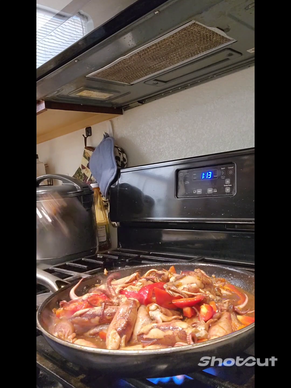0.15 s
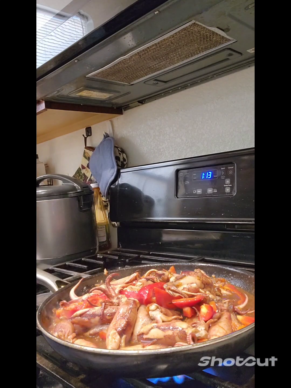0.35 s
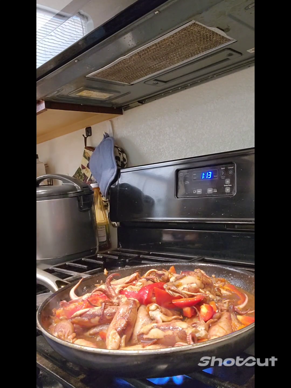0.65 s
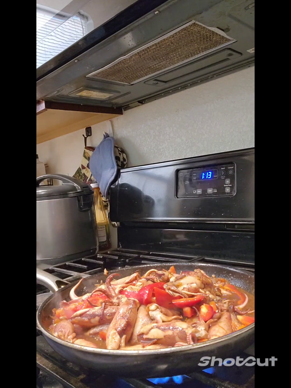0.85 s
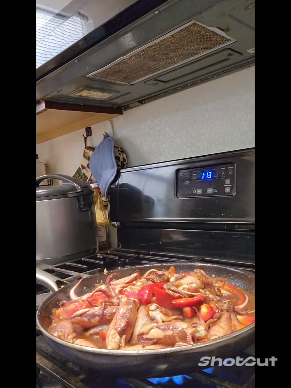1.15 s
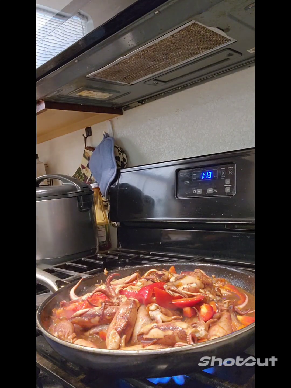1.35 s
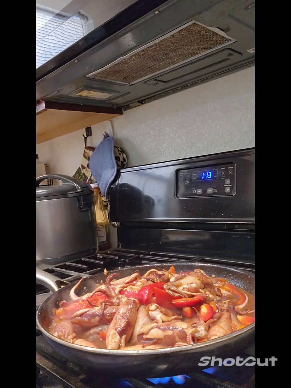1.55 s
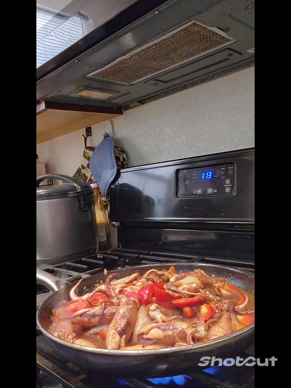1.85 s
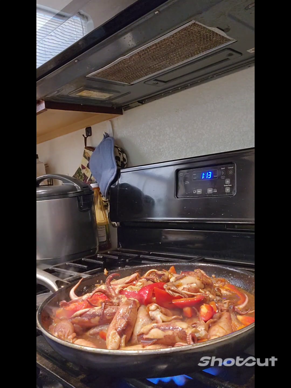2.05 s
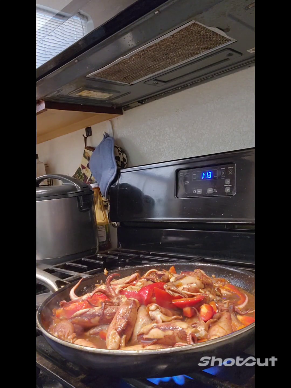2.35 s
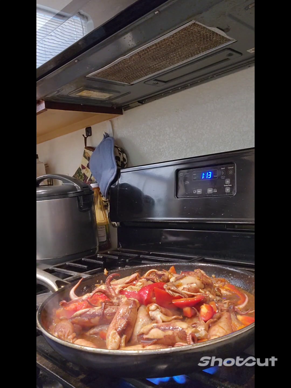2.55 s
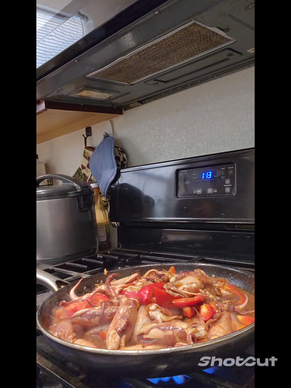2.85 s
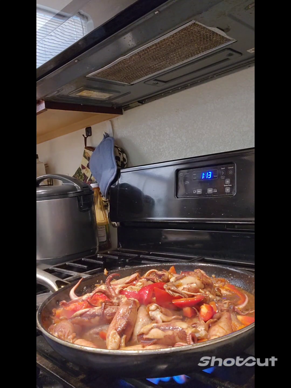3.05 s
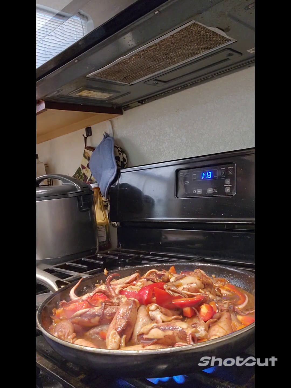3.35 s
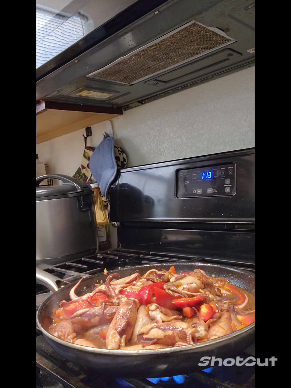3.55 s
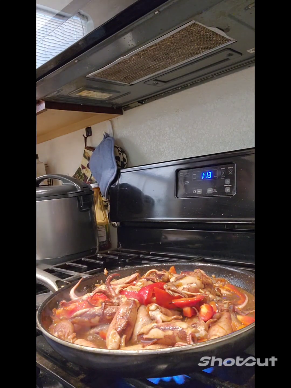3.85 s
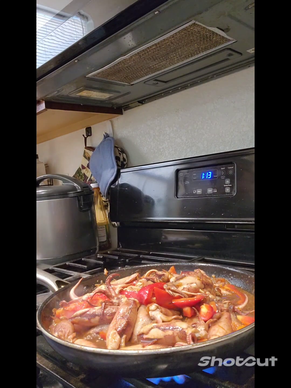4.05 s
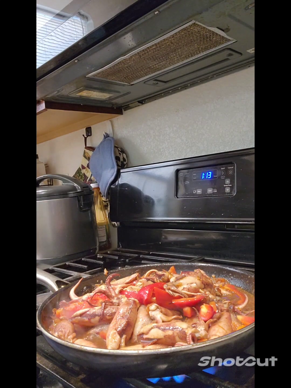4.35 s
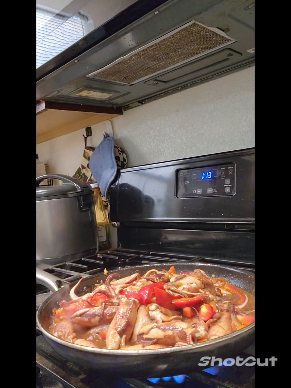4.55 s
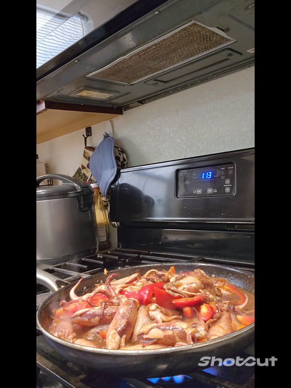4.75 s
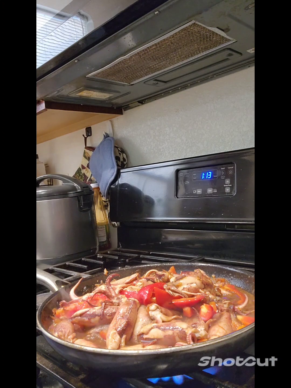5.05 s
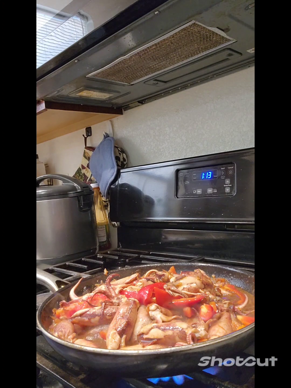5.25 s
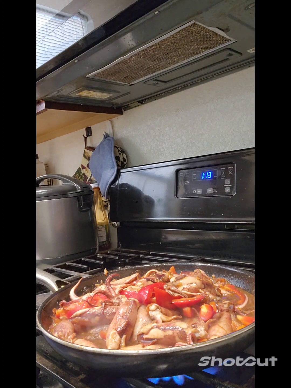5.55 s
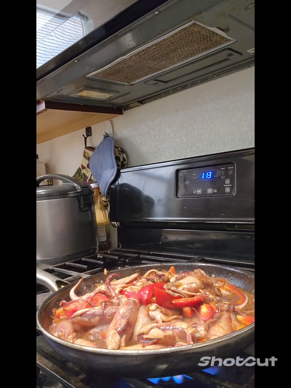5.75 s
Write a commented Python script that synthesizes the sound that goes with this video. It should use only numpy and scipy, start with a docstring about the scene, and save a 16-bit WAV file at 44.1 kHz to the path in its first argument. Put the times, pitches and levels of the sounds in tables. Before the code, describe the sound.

A gas flame rumbles quietly throughout, with the faint fizz of food simmering in a pan close to the microphone in a small kitchen. At about 0.1 seconds, metal tongs tap the pan once, slightly left, making it ring briefly and the stove top hum. From 0.8 to 1.7 seconds the tongs land on the counter and rattle to rest in about a dozen uneven, fading clacks, with a bubble popping among them. Faint rustles follow around 1.9 and 2.5 seconds. At 3.4 seconds comes the loudest sound, something like a cupboard door banging shut on the right, with a low boom, a short jangle of hardware and an immediate softer rebound. Soft rubbing movements are heard from 4 to 4.7 seconds. Four small bubbles pop in the sauce between 5 and 5.3 seconds, and one last faint rustle passes at 5.6 over the steady flame.

```python
"""A small kitchen, the microphone close to a pan of meat and vegetables simmering on a gas stove.
Tongs tap the pan and ring it, then are laid on the counter and rattle to rest. Something like a
cupboard door bangs shut and rebounds, its panel booming and its hardware jangling. A few thick
bubbles pop in the sauce and soft movements rustle nearby, over the low rumble of the flame
and the fizz of countless tiny bursts."""
import sys
import numpy as np
from scipy import signal
from scipy.fft import rfft, irfft
from scipy.io import wavfile
from scipy.ndimage import uniform_filter1d

SR = 44100
rng = np.random.default_rng(int(sys.argv[2]) if len(sys.argv) > 2 else 0)


def digitize_waveform(pressure):
    """Quantize a signal to 16-bit integers and store it at the path in sys.argv[1].

    Rows of a 2-D input are taken as channels; values are limited to [-1, 1].
    """
    field = np.atleast_2d(pressure).T
    bounded = np.clip(field, -1, 1)
    quanta = np.round(bounded * 32767).astype(np.int16)
    wavfile.write(sys.argv[1], SR, quanta)


N = 259483
AGE = np.arange(SR) / SR  # time since a blow [s]

# modes of the pan: (frequency [Hz], level [dB], t60 [s])
PAN_MODES = [(665, -16, 0.27), (815, -17, 0.24), (990, -23, 0.13), (1106, 12, 0.23), (1325, 11, 0.042),
             (1596, -3, .12), (1940, -3, 0.083), (1950, 0, 0.12), (3380, 0, .2), (4870, -23, 0.18)]


def tongs_on_pan(out):
    """A hard tap ticks and rings the pan, which shakes the stove top and chatters on its grate."""
    # taps: (time [s], level [dB], stove level [dB])
    taps = [(0.089, -18, -31)]
    # spectrum of the contact: (frequency [Hz], gain [dB])
    pan_colour = [(59, -20), (100, 2.5), (324, 4), (452, -2.5), (718, -4.5), (942, -13), (1090, 1),
                  (1430, -41), (2090, -5), (2520, -38), (3320, -16), (5040, -17.5), (6090, -25.5),
                  (15000, -52)]
    # modes of the stove top: (frequency [Hz], level [dB], t60 [s])
    stove_modes = [(71.1, -0.5, 0.85), (124, 1, 0.43), (190.4, -9.5, 0.66), (250, -4, 0.25),
                   (360, -7, 0.46)]
    for s, db, stove_db in taps:
        contact = unit(colour(crack(t60=0.017, room_db=-1.5, near_db=3, left_db=11), pan_colour))
        tick = undb(-3) * unit(ports(np.sin(2 * np.pi * 1650 * AGE) * fade(0.0093)))
        pan = undb(-7) * ring(PAN_MODES, spread=0.27)
        add(out, s, peak_level(tick + contact + pan, db))
        chatter = band(diffuse(len(AGE)), 660, 1430) * fade(0.14)
        add(out, s + 0.008, peak_level(chatter, -26))
        stove = ring(stove_modes, spread=0.15) * rise(0.0088)
        add(out, s, peak_level(stove, stove_db))


def tongs_on_counter(out, full_blow_db=-24):
    """The tongs land and rock: heavy blows last longer with more bass, hard ones ring the arms more."""
    # blows: (time [s], level [dB], treble [dB], counter ring [dB])
    blows = [(0.819, -21, 5.5, -9.5), (0.8764, -35.5, -17, -24), (1.004, -18.5, -1.5, 0),
             (1.133, -42.5, -10, -5), (1.210, -31.5, -3, 0), (1.267, -37.5, -3, -12),
             (1.3115, -25, 5.5, -9), (1.397, -34, 4.5, 2.5), (1.407, -35, -8, -2), (1.458, -38, 1.5, -1),
             (1.503, -40, 0, -2), (1.7283, -42.5, -6, -7)]
    # spectrum of the contact: (frequency [Hz], gain [dB])
    contact_colour = [(59, -32), (100, -5.5), (434, -11), (885, -4.5), (1000, -8), (1590, -6), (1880, -12),
                      (2090, -9), (2800, -17.5), (3760, -13), (4730, -24.5), (5260, -21.5), (7510, -29.5),
                      (9070, -36), (15000, -50)]
    # modes of the steel arms: (frequency [Hz], level [dB], t60 [s])
    arm_modes = [(650, -7.5, 0.064), (774, -14, 0.077), (1266, 15, 0.04), (1488, -5, 0.13),
                 (2326, -0.5, 0.15), (2380, -7, .18), (3560, -3, 0.13), (4200, -18, 0.42),
                 (5030, 5.5, 0.034), (7400, -5, .05)]
    # modes of the counter: (frequency [Hz], level [dB], t60 [s])
    counter_modes = [(531, -14.5, 0.39), (750, -19, 0.12), (878, 3.5, 0.13), (1095, -6, 0.082),
                     (1177, 5, 0.073), (1347, 9.5, 0.048), (1604, 0, 0.15), (1744, -23, 0.089),
                     (2000, -6, 0.14), (3190, -14.5, 0.15), (3360, -11, 0.083), (4223, -9.5, 0.09)]
    for s, db, treble_db, counter_db in blows:
        force_db = db - full_blow_db
        t60 = 0.051 * undb(0.2 * force_db)
        contact = unit(colour(crack(t60, room_db=-5.5, near_db=-6, left_db=3), contact_colour))
        arms = undb(-7.5 + 0.25 * treble_db) * ring(arm_modes, spread=0.25)
        counter = undb(counter_db) * ring(counter_modes, spread=0.24)
        blow = (contact + arms + counter) * rise(0.0012)
        hardness = [(350, -1 + 0.11 * force_db), (800, -0.89), (1900, 0.62), (4200, treble_db)]
        add(out, s, peak_level(colour(blow, hardness), db))


def tongs_squeak(out):
    """Steel slides on the counter with a faint, wavering tone."""
    # slides: (time [s], length [s], pitch [Hz], level [dB])
    slides = [(1.233, 0.091, 3345, -50)]
    for s, length, hz, db in slides:
        count = int(length * SR)
        waver = uniform_filter1d(rng.standard_normal(count), size=100)
        tone = np.sin(2 * np.pi * np.cumsum(hz * (1 + 0.11 * waver)) / SR)
        add(out, s, peak_level(ports(tone * signal.windows.tukey(count, 0.5)), db))


def cupboard_door(out, crack_db=-14.5, latch_t60=0.35):
    """Off to the right a door panel booms, its hardware jangles, and the room answers."""
    # the bang and its rebound: (time [s], force [dB])
    knocks = [(3.3906, 0.5), (3.506, -16.5)]
    # spectrum of the contact: (frequency [Hz], gain [dB])
    door_colour = [(88, -33), (150, -1), (238, -12.5), (371, -7.5), (612, -13), (757, -14.5), (1200, -21.5),
                   (1350, -19.5), (1670, -21.5), (2360, -19.5), (2600, -25.5), (3210, -20.5), (3970, -22),
                   (5510, -18), (15000, -45.5)]
    # modes of the panel: (frequency [Hz], level [dB], t60 [s])
    panel_modes = [(55, -27, 0.22), (76.1, 2, 0.33), (93.7, -8, 0.12), (121.5, -4.5, 0.21), (140, -16, 0.4),
                   (190, 1, 0.046), (246, -4.5, 0.063), (282.7, -12.5, 0.13), (304, -28, 0.096),
                   (338.4, -13.5, 0.19), (381, -19.5, 0.32), (463, -16, 0.23), (528, -19, 0.23)]
    # modes of the hardware: (frequency [Hz], level [dB], undamped t60 [s])
    hardware_modes = [(740, 6, 0.35), (990, -1, 0.13), (1341, 7, 0.16), (1844, 8, 0.11), (2130, -21, 0.19),
                      (3030, -14, 0.17), (3000, -14, 0.12), (4580, -30, 0.22), (4050, -18, 0.35),
                      (5640, -9, 0.34), (5190, -3, 0.28), (5500, -19, 0.2), (5500, -5, 0.11),
                      (6460, -14, 0.16), (7600, -13, 0.22)]
    for s, force_db in knocks:
        # a softer knock keeps more of its thud, is duller and pushes for longer
        thud_db = -9.5 + 0.5 * force_db
        hardness = [(120, -2.5), (400, -2.5), (1500, 1.5), (6000, 0.5 + 0.52 * force_db)]
        push = rise(0.0014 * undb(-0.36 * force_db))
        contact = unit(colour(crack(t60=0.042, room_db=1.5, near_db=-1.5, left_db=-13), door_colour))
        jangle = undb(-6.5) * ring(hardware_modes, spread=1.4) * fade(latch_t60)  # the shut door damps it
        blow = (contact + jangle) * rise(0.0021)
        add(out, s, peak_level(colour(blow, hardness), crack_db + force_db))
        # the heavy panel follows a moment later, swinging away from the microphone first
        thud = band(ring(panel_modes, spread=0.058) * push, 35, 2000)
        add(out, s + 0.0024, -peak_level(thud, thud_db))
        # the bass builds up slowly in the room and stays longest
        boom = band(diffuse(len(AGE)), 83, 285) * fade(0.39) * rise(0.0072)
        add(out, s, peak_level(boom, thud_db - 15))


def sauce_bubbles(out, hollow_hz=600, hollow_db=-11.5):
    """A bubble's film snaps; its cavity and the hollow below ring briefly, almost dry this close."""
    # bubbles: (time [s], cavity level [dB], pitch [Hz], relative snap [dB])
    bubbles = [(1.159, -23, 930, -19), (4.9991, -26.5, 1568, -3), (5.160, -31, 1696, 0),
               (5.2167, -24.5, 1635, -12), (5.241, -35, 1634, -25)]
    # spectrum of the snap: (frequency [Hz], gain [dB])
    film_colour = [(150, -31), (500, 2), (1900, 1.5), (3000, -6), (8000, -2), (15000, -33)]
    for s, db, hz, snap_db in bubbles:
        t60 = 0.031 * (hz / 1650) ** 1.6  # larger, lower bubbles die sooner in the thick sauce
        cavity = np.sin(2 * np.pi * hz * AGE) * fade(t60)
        hollow = undb(hollow_db) * np.sin(2 * np.pi * hollow_hz * AGE) * fade(0.037)
        film = colour(rng.standard_normal(len(AGE)), film_colour)[0] * fade(0.042)
        pop = undb(db) * (cavity + hollow + undb(snap_db) * film)
        room = undb(-11) * kitchen(low_t60=0.25, high_t60=0.2)
        add(out, s, ports(pop) + convolve(pop, room))


def rustles(out, crinkle_db=3, typical_touch_s=0.048):
    """Soft movements near the microphone: a dull bump under an uneven swish of rubbing."""
    # touches: (time [s], length [s], swish level [dB], treble [dB])
    touches = [(0, 0.043, -56.5, -16.5), (1.874, 0.12, -51.5, 8), (2.505, .14, -54, -18),
               (3.959, 0.049, -49.5, 3), (4.167, 0.089, -48.5, 6), (4.222, .082, -49.5, -7),
               (4.439, 0.047, -55, -9), (4.479, 0.11, -48, -4), (4.585, 0.023, -46.5, 1.5),
               (4.61, 0.081, -44, -1), (4.641, 0.012, -43.5, 4), (5.577, 0.12, -53, 1)]
    # spectrum of the rubbing: (frequency [Hz], gain [dB])
    rub_colour = [(200, 12), (650, 12.5), (2000, 5), (3000, 0), (6000, 5), (9000, -3), (15000, -8)]
    for s, length, db, treble_db in touches:
        count = int(length * SR)
        swell = np.hanning(count)
        # duller and briefer touches bump harder
        bump_db = db + 2 - 0.61 * treble_db + 10 * np.log10(typical_touch_s / length)
        add(out, s, level(band(diffuse(count), 137, 310), bump_db) * swell)
        crinkle = level(uniform_filter1d(rng.standard_normal(count), size=130), 0)
        swish = colour(diffuse(count) * undb(crinkle_db * crinkle), rub_colour)
        add(out, s, level(colour(swish, [(1500, 0), (6000, treble_db)]), db) * swell)


def gas_flame(flame_db=-49, flutter_db=1):
    """The flame under the pan rumbles and flutters."""
    # spectrum of the flame: (frequency [Hz], gain [dB])
    flame_colour = [(15, -18), (25, -4.5), (59, 2), (125, 1), (154, -4.5), (326, -8), (363, -4), (438, -11),
                    (673, -10.5), (790, -14), (856, -15.5), (2130, -21), (2700, -24.5), (3260, -21),
                    (15000, -40)]
    flutter = level(band(rng.standard_normal(N), 3.36, 10.25), 0)
    return level(colour(diffuse(N), flame_colour) * undb(flutter_db * flutter), flame_db)


def simmer(bursts_per_s=400, spread_db=4.5, fizz_db=-65, ring_db=-69):
    """The sauce hisses with countless tiny bursts that set the pan ringing faintly."""
    # spectrum of a burst: (frequency [Hz], gain [dB])
    fizz_colour = [(300, -13), (1600, -8.5), (2150, 15.5), (2600, -9), (3050, 0), (4000, -17),
                   (5400, 13.5), (6300, -42), (7400, 8), (9000, -21), (15000, -22)]
    sizes = undb(spread_db * np.minimum(rng.exponential(size=N), 5))
    bursts = (rng.random(N) < bursts_per_s / SR) * sizes
    fizz = ports(colour(bursts, fizz_colour)[0], left_db=6.5)
    pan = convolve(bursts, ring(PAN_MODES, spread=1))
    return level(fizz, fizz_db) + level(pan, ring_db)


def stove_surrounds(x):
    """Small hard surfaces around the stove mirror the treble and ripple its spectrum."""
    # echoes off the back panel, hood and pot: (left delay [s], right delay [s], level [dB])
    echoes = [(.00092, 0.0019, -29), (.00231, 0.0025, -16), (.00415, 0.0059, -16), (.0063, 0.016, -10)]
    bright = band(x, 1030, 9800)
    out = x.copy()
    for left_s, right_s, db in echoes:
        for port, delay in enumerate((left_s, right_s)):
            lag = int(delay * SR)
            out[port, lag:] += undb(db) * bright[port, :N - lag]
    return out


def kitchen(low_t60=0.32, high_t60=0.21, build_s=0.0057):
    """The room's reflections build up within milliseconds; the treble dies first."""
    noise = diffuse(len(AGE))
    low = signal.sosfilt(signal.butter(1, 2000, fs=SR, output="sos"), noise)
    return unit((low * fade(low_t60) + (noise - low) * fade(high_t60)) * rise(build_s))


def crack(t60, room_db, near_db, left_db):
    """Dense short-lived vibration at a contact, its echo off nearby surfaces, then the room."""
    direct = ports(rng.standard_normal(len(AGE)) * fade(t60), left_db)
    near = diffuse(len(AGE)) * fade(t60) * AGE
    return unit(direct) + undb(near_db) * unit(near) + undb(room_db) * kitchen()


def ring(modes, spread):
    """Damped modes, weighted a little anew each blow; spread [rad] scatters their phase at the ports."""
    out = 0
    for (hz, db, t60), (scatter_db, turn) in zip(modes, rng.standard_normal((len(modes), 2))):
        phase = 2 * np.pi * hz * AGE + spread * turn * np.array([[1], [-1]])
        out = out + undb(db + scatter_db) * fade(t60) * np.sin(phase)
    return unit(out)


def ports(x, left_db=0, lag=3):
    """Direct sound reaches the microphone's left port a few samples late, left_db above the right."""
    return np.array([np.roll(x, lag) * undb(left_db / 2), x * undb(-left_db / 2)])


def diffuse(count, split_hz=520):
    """Noise from all around: alike at both ports in the bass, unrelated in the treble."""
    mid, side = rng.standard_normal((2, count))
    side = signal.sosfilt(signal.butter(2, split_hz, "high", fs=SR, output="sos"), side)
    return np.array([mid + side, mid - side])


def rise(seconds):
    """Attack with this time constant."""
    return 1 - np.exp(-AGE / seconds)


def fade(t60):
    """Decay by 60 dB in t60 seconds."""
    return undb(-60 * AGE / max(t60, 0.002))


def colour(x, points, size=4096):
    """Minimum-phase filter through (frequency [Hz], gain [dB]) points."""
    hz, db = np.transpose(points)
    gain_db = np.interp(np.log(np.fft.rfftfreq(size, 1 / SR) + 1), np.log(hz), db)
    cepstrum = irfft(np.log(undb(gain_db)))
    cepstrum[1:size // 2] *= 2
    cepstrum[size // 2 + 1:] = 0
    response = irfft(np.exp(rfft(cepstrum)))
    return convolve(x, response[None])


def convolve(x, response):
    """Pass x through an impulse response, keeping its length."""
    return signal.fftconvolve(np.atleast_2d(x), response, axes=-1)[:, :x.shape[-1]]


def band(x, lo_hz, hi_hz):
    """Band-pass filter."""
    return signal.sosfilt(signal.butter(2, [lo_hz, hi_hz], "band", fs=SR, output="sos"), x)


def undb(db):
    """Decibels to gain."""
    return 10 ** (np.asarray(db) / 20)


def unit(x):
    """Scale to an energy of one."""
    return x / np.sqrt(np.mean(np.sum(x ** 2, axis=-1)))


def level(x, db):
    """Scale to an rms level."""
    return x * undb(db) / np.sqrt(np.mean(x ** 2))


def peak_level(x, db, size=300):
    """Scale so that the loudest few milliseconds have this level."""
    power = uniform_filter1d(np.mean(np.atleast_2d(x) ** 2, axis=0), size)
    return x * undb(db) / np.sqrt(power.max())


def add(out, s, x):
    """Mix x into out from time s."""
    start = int(s * SR)
    out[:, start:start + x.shape[-1]] += x[..., :N - start]


def scene():
    """The kitchen as heard from beside the stove."""
    out = gas_flame() + simmer()
    for source in (tongs_on_pan, tongs_on_counter, tongs_squeak, cupboard_door, sauce_bubbles, rustles):
        source(out)
    return stove_surrounds(out)


def record(dry, left_treble_db=1.9, top_hz=15500):
    """The microphone's left port is a little brighter; the recorder clips and cuts the top."""
    # response of both ports: (frequency [Hz], gain [dB])
    port_colour = [(5600, -0.5), (7600, -1), (8700, -3.5), (9700, -2.5), (14500, -1)]
    left = colour(dry[0], [(250, 0.0069), (1200, left_treble_db)])[0]
    heard = colour(np.array([left, dry[1]]), port_colour)
    lowpass = signal.ellip(10, 0.2, 80, top_hz, fs=SR, output="sos")
    return signal.sosfilt(lowpass, np.clip(heard, -1, 1))


dry = scene()
out = record(dry)
digitize_waveform(out)
```